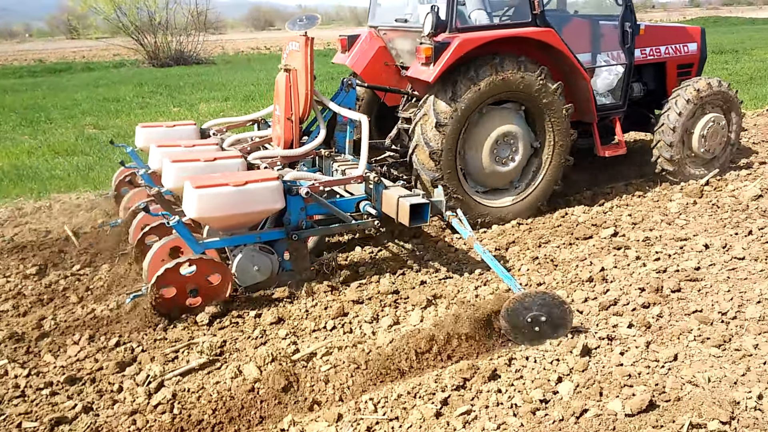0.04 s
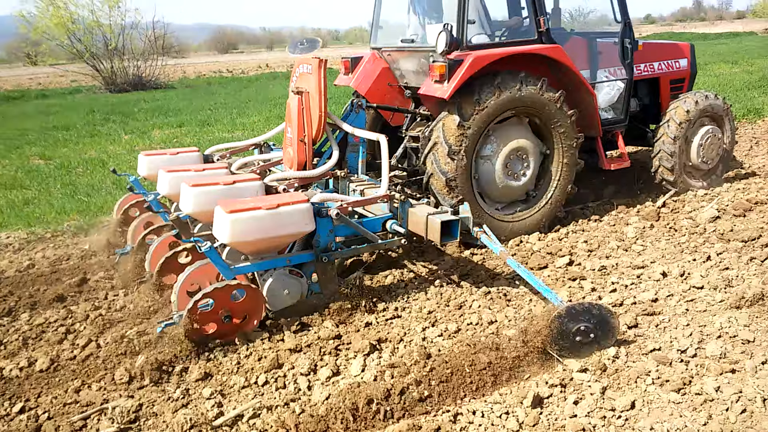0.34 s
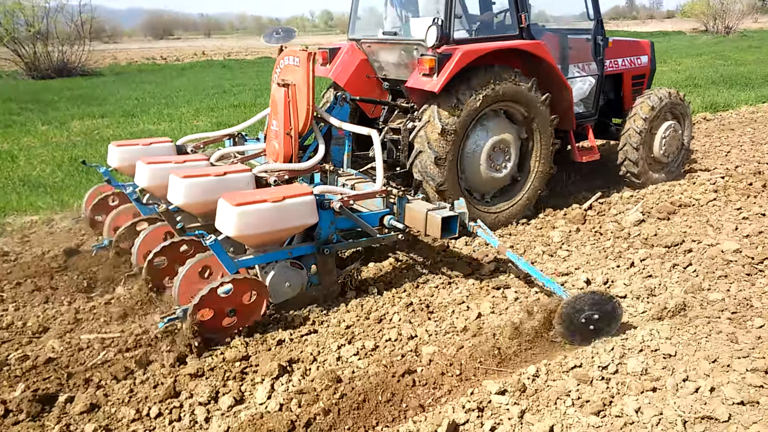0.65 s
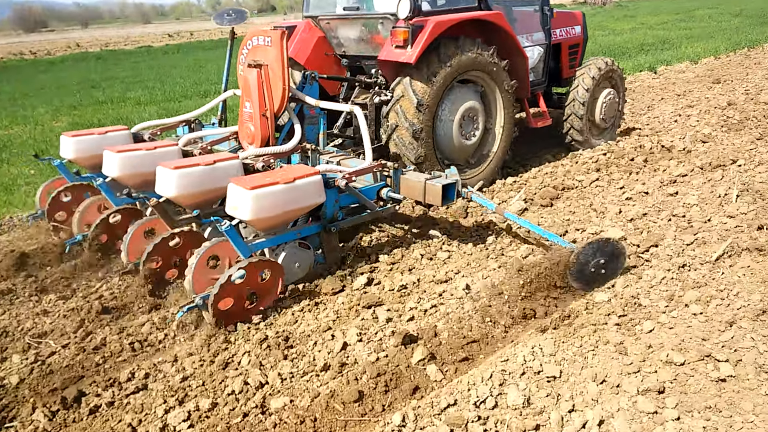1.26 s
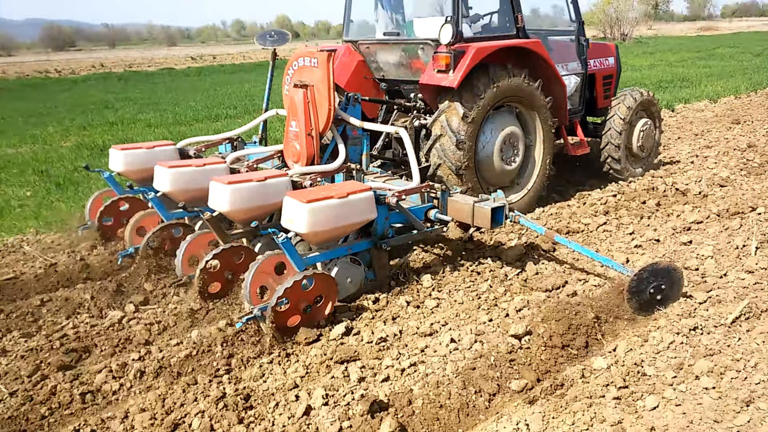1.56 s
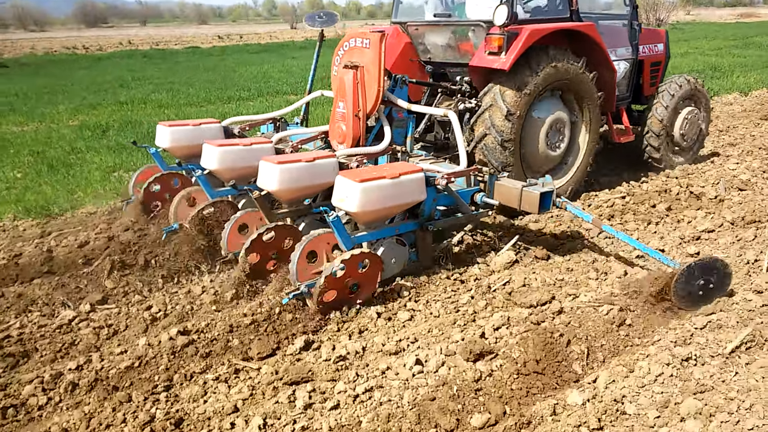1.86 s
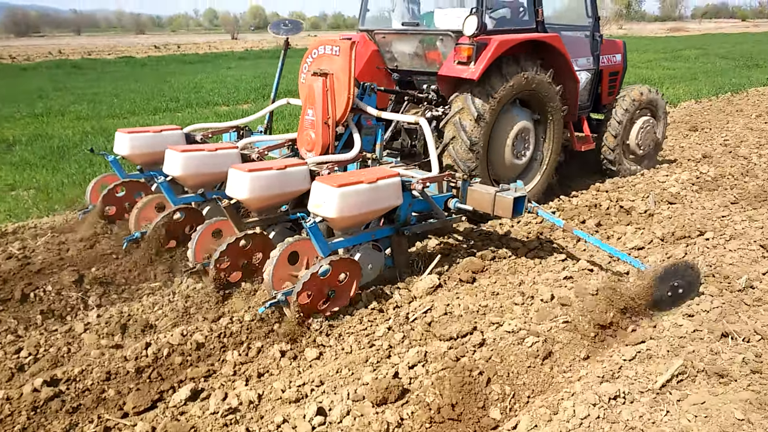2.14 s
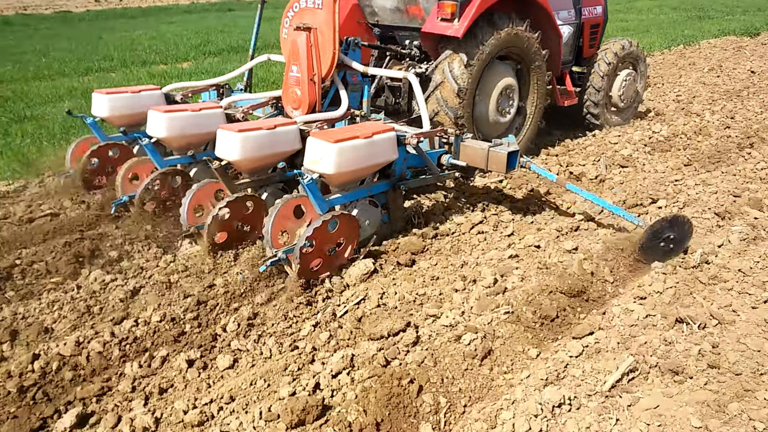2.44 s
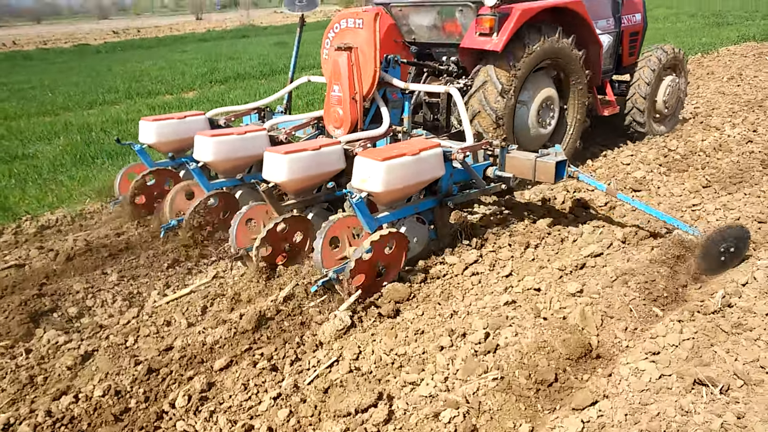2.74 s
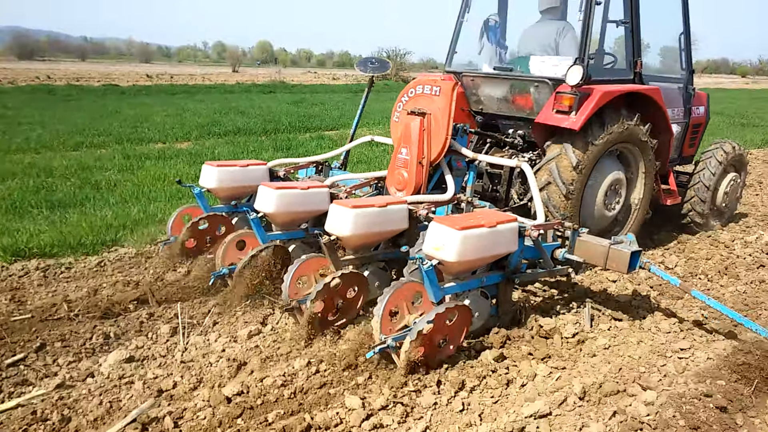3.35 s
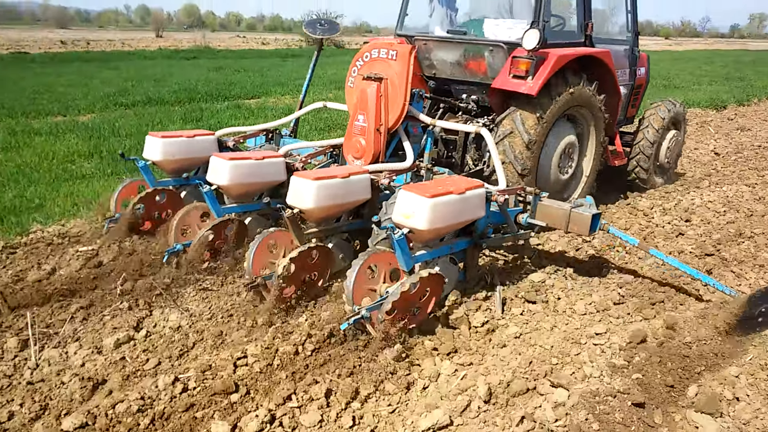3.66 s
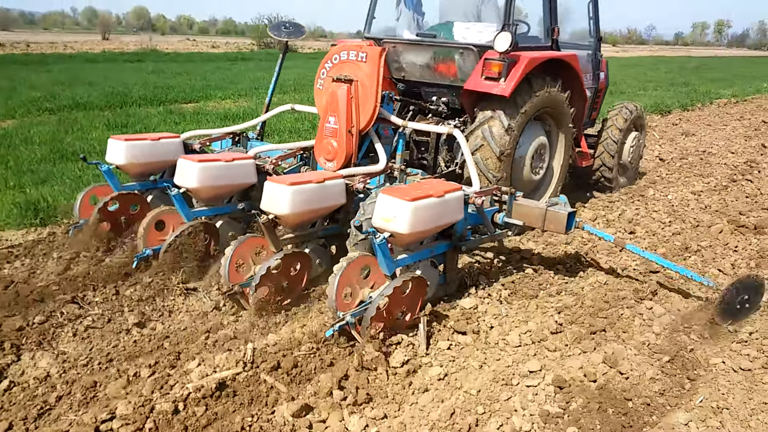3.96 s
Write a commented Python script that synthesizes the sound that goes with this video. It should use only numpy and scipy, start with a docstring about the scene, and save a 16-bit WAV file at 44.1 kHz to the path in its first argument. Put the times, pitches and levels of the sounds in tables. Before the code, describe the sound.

A diesel tractor engine clatters steadily, its tone shifting as it draws ahead. The seed planter behind it adds a wavering fan whine and faint clinks. Wind buffets and hisses on the microphone, gusting strongly from about 1 to 2 seconds. A shrill wind whistle sounds around 2.2 to 2.4 seconds, the heaviest wind thumps land near 3 seconds, and two quick dull clanks come at 3.8 seconds.

```python
"""Tractor and seed planter in wind.

A diesel tractor pulls a clinking planter with a whining fan across a field, heard from beside,
then from behind. Firings ring the block and panels over a low exhaust note. Gusts buffet the
microphone, hiss across its port and make it whistle; a limiter ducks the mix at the peaks."""
import sys
import numpy as np
from scipy import signal
from scipy.fft import rfft, irfft
from scipy.io import wavfile
from scipy.ndimage import uniform_filter1d, minimum_filter1d

SR = 44100
rng = np.random.default_rng(int(sys.argv[2]) if len(sys.argv) > 2 else 0)


def store_wav(level_fs):
    """Save 16-bit WAV to argv[1]."""
    pcm = np.round(np.clip(np.atleast_2d(level_fs), -1, 1) * 32767)
    wavfile.write(sys.argv[1], SR, pcm.T.astype(np.int16))


N = 176400
TIME = np.arange(N) / SR

# Spectrum of air hiss and grit. Each row: frequency in Hz, relative density in dB.
HISS_SPECTRUM = [(2000, -21), (4200, -29), (5500, -18.5), (6300, -14), (6600, -2), (6950, -13.5),
                 (7700, -3), (8500, 0), (9600, 0.5), (10800, -0.5), (12000, -3), (13200, -12.5),
                 (16000, -11.5)]


def from_db(db):
    """Decibels to gain."""
    return 10 ** (np.asarray(db) / 20)


def rms_one(x):
    """Scale to rms 1."""
    return x / np.sqrt(np.mean(x ** 2) + 1e-20)


def in_time(rows):
    """Columns after the time column, interpolated to every sample."""
    times_s, *columns = np.transpose(rows)
    return [np.interp(TIME, times_s, column) for column in columns]


def white():
    """Fresh white noise."""
    return rng.standard_normal(N)


def ticks(per_s):
    """Random impulses of uneven size."""
    return (rng.random(N) < per_s / SR) * np.minimum(rng.exponential(1, N), 3)


def drift(rate_hz):
    """Smooth random wander, rms 1."""
    pole = np.exp(-20 * np.pi * rate_hz / SR)  # runs at SR / 10
    slow = signal.lfilter([1], [1, -2 * pole, pole * pole], rng.standard_normal(N // 10 + 4002))[4000:]
    return np.interp(np.arange(N) / 10, np.arange(len(slow)), rms_one(slow))


def colour(x, spectrum):
    """Shape by a smooth spectrum, rolled off below 20 Hz; rms 1."""
    hz, db = np.transpose(spectrum)
    bins_hz = np.maximum(np.fft.rfftfreq(N, 1 / SR), 1)
    gain = from_db(np.interp(np.log(bins_hz), np.log(hz), db)) * np.minimum(bins_hz / 20, 1)
    return rms_one(irfft(rfft(x) * gain, N))


def resonate(x, hz, width_hz):
    """Steep-skirted resonance, rms 1."""
    band = signal.butter(2, [hz - width_hz / 2, hz + width_hz / 2], "band", fs=SR, output="sos")
    return rms_one(signal.sosfilt(band, x))


def breathy(hz, half_width_hz):
    """Noise band with a moving centre, rms 1."""
    lowpass = signal.butter(2, half_width_hz, fs=SR, output="sos")
    baseband = signal.sosfilt(lowpass, white() + 1j * white())
    return rms_one(np.real(baseband * np.exp(2j * np.pi * np.cumsum(hz) / SR)))


def air_hiss():
    """Fluttering air hiss with grains of crumbling soil, plus two microphone port resonances."""
    # Hiss and lower resonance. Each row: time in seconds, level in dB.
    hiss_levels = [(0, -25), (.12, -17.5), (.2, -21.5), (.46, -18), (.72, -21), (.95, -20), (1.05, -28),
                   (1.11, -20), (1.15, -24), (1.28, -15), (1.38, -25), (1.52, -18), (1.9, -12.5),
                   (2.1, -19), (2.22, -18.5), (2.35, -13.5), (2.47, -12.5), (2.52, -31), (2.8, -53),
                   (3.03, -21), (3.16, -27), (3.26, -20), (3.35, -18), (3.5, -13.5), (3.7, -13), (4, -13)]
    port_levels = [(0, -34), (1.2, -34.5), (1.4, -38), (1.85, -29), (2.12, -31), (2.2, -25.5),
                   (2.45, -23.5), (2.5, -24.5), (2.62, -21.5), (2.8, -22.5), (2.855, -20.5), (2.89, -30.5),
                   (3.05, -24.5), (3.14, -24.5), (3.25, -21.5), (3.3, -28), (3.4, -41), (4, -40)]
    # Lower resonance. Each row: time in seconds, centre in Hz.
    port_centres = [(0, 5280), (2.2, 5300), (2.6, 5430), (2.85, 5230), (3.05, 5060), (3.2, 4880),
                    (3.27, 4570), (4, 4967)]
    # Upper resonance. Each row: time in seconds, centre in Hz, level in dB.
    swish_curve = [(0, 8440, -40), (.7, 8490, -24.5), (1.15, 8300, -22.5), (1.8, 8300, -16.5),
                   (2.1, 8500, -24), (2.35, 9700, -25), (2.5, 11300, -28), (2.68, 11300, -34.5),
                   (2.85, 10500, -29.5), (3.05, 9400, -19.5), (3.13, 9340, -36), (3.25, 10220, -11),
                   (3.36, 9270, -19), (3.55, 8720, -15.5), (4, 8450, -15.5)]
    hiss_db, = in_time(hiss_levels)
    port_db, = in_time(port_levels)
    port_hz, = in_time(port_centres)
    swish_hz, swish_db = in_time(swish_curve)
    grain_decay_s, flutter_db = .003, 0.57
    grains = signal.lfilter([1], [1, -np.exp(-1 / (grain_decay_s * SR))], ticks(per_s=110))
    hiss = from_db(hiss_db - 2.5) * colour(white() * (1 + .27 * grains), HISS_SPECTRUM)
    port = from_db(port_db) * breathy(port_hz, half_width_hz=353)
    swish = from_db(swish_db) * breathy(swish_hz, half_width_hz=580)
    return (hiss + port + swish) * from_db(flutter_db * drift(32))


def port_whistle():
    """Edge tone at the port with two overtones: once faint, once loud."""
    # Each row: time in seconds, pitch in Hz, level in dB, relative octave level in dB.
    curve = [(.15, 5300, -58, -8), (.2, 5370, -35, -6), (.24, 5380, -27, 2), (.28, 5300, -70, -10),
             (2.15, 5380, -80, -30), (2.2, 5300, -29, -30), (2.228, 5130, -10, -28),
             (2.244, 5140, -17, -25), (2.26, 5100, -12, -24), (2.295, 5130, -0.5, -11),
             (2.33, 5176, -6, -10), (2.356, 5390, -13, 3), (2.40, 5283, -4, -15), (2.414, 5330, -5.5, -20),
             (2.435, 5490, -23, -20)]
    jitter_hz, flutter_db, third_harmonic_db = 17, 1.7, -26
    hz, db, octave_db = in_time(curve)
    phase = 2 * np.pi * np.cumsum(hz + jitter_hz * drift(136)) / SR
    tone = np.sin(phase) + from_db(octave_db) * np.sin(2 * phase)
    tone += from_db(third_harmonic_db) * np.sin(3 * phase)
    sounding = (TIME > curve[0][0]) * (TIME < curve[-1][0])
    return np.sqrt(2) * from_db(db + flutter_db * drift(80)) * tone * sounding


def buffeting():
    """Lumpy turbulence and single eddy thuds on the microphone, over a deep rumble."""
    # Each row: time in seconds, level in dB.
    gusts = [(0, -8.5), (.05, -16.5), (.13, -12), (.2, -8), (.35, -10.5), (.39, -16), (.5, -23),
             (.55, -5.5), (.59, -21), (.66, -15), (.7, -20), (.78, -22), (.81, -3.5), (.92, -15.5),
             (.96, -1.5), (1.05, -7), (1.08, -18.5), (1.16, -0.5), (1.2, -16), (1.23, -1.5), (1.26, -16),
             (1.36, 5), (1.47, -7.5), (1.59, -2.5), (1.65, -9.5), (1.78, -1), (1.93, 0), (2.05, -0.5),
             (2.14, -9.5), (2.24, -24), (2.45, -16.5), (2.49, -1.5), (2.54, -21.5), (2.7, -15), (2.82, -29),
             (2.86, -5), (2.93, 7), (3.03, -2.5), (3.19, 0.5), (3.23, -20), (3.28, -0.5), (3.34, -4.5),
             (3.37, -9.5), (3.5, -13), (3.72, -33), (4, -21)]
    eddies = [(2.939, 2.5), (3.006, -3), (3.083, 12.5), (3.119, 12.5), (3.190, -4), (3.312, -12)]
    # Each row: frequency in Hz, relative density in dB.
    buffet_spectrum = [(20, -22), (50, -15), (110, 2), (240, 0), (400, -6.5), (650, -13.5), (1000, -25),
                       (2000, -44.5), (4000, -71), (16000, -78)]
    rumble_spectrum = [(20, -11), (50, -0.5), (110, 2), (200, -17), (500, -40), (2000, -76)]
    lump_depth_db, thud_rise_s, thud_decay_s = 3, 0.0025, 0.011
    gust_db, = in_time(gusts)
    thud_envelope = np.zeros(N)
    for start_s, db in eddies:
        age_s = np.maximum(TIME - start_s, 0)
        thud_envelope += from_db(db) * np.exp(-age_s / thud_decay_s) * (1 - np.exp(-age_s / thud_rise_s))
    lumps = colour(white() * from_db(lump_depth_db * drift(52)), buffet_spectrum)
    rumble = from_db(-10 + .85 * gust_db) * colour(white(), rumble_spectrum)
    return from_db(gust_db) * lumps + thud_envelope * colour(white(), buffet_spectrum) + rumble


def grit():
    """Sparse 1 ms ticks of dry soil on the steel discs."""
    envelope = signal.lfilter([1], [1, -np.exp(-1000 / SR)], ticks(per_s=25) + 1e-18)
    return from_db(-33) * colour(envelope * white(), HISS_SPECTRUM)


def clinks():
    """Loose links and seed discs ring briefly at random."""
    # Each row: frequency in Hz, level in dB.
    modes = [(1150, -36), (1330, -41), (1480, -41), (1760, -37.5), (1890, -35), (2030, -44), (2310, -45)]
    width_hz = 23
    radius = np.exp(-np.pi * width_hz / SR)
    out = np.zeros(N)
    for hz, db in modes:
        hits = ticks(per_s=12) + 1e-9 * white()
        feedback = [1, -2 * radius * np.cos(2 * np.pi * hz / SR), radius * radius]
        out += from_db(db) * rms_one(signal.lfilter([1, 0, -1], feedback, hits))
    return out


def frame_knocks():
    """Short, dull clanks of the planter frame over clods."""
    # Each row: start in seconds, level in dB.
    knocks = [(3.787, -14.5), (3.814, -13)]
    # Each row: frequency in Hz, relative density in dB.
    spectrum = [(200, -8), (400, 0), (1500, 0), (2200, -1), (2700, 2), (3100, -5), (3500, -2), (4300, -12),
                (7000, -6), (12000, -23)]
    decay_s = 0.013
    envelope = sum(from_db(db) * (TIME >= start_s) * np.exp(-np.abs(TIME - start_s) / decay_s)
                   for start_s, db in knocks)
    return envelope * colour(white(), spectrum)


def fan(firings):
    """Planter fan geared to the engine: a wavering whine and a lower drone."""
    # Each row: time in seconds, whine level in dB, drone level in dB.
    levels = [(0, -37, -20), (.55, -19, -76.5), (1.0, -41, -26.5), (1.8, -24, -21), (2.3, -22, -34),
              (2.7, -17.5, -29.5), (3.2, -29, -12.5), (3.75, -21.5, -27), (4, -33.5, -16)]
    cycles_per_firing, waver_depth, waver_rad = (16.98, 11.35), 0.32, 0.32
    out = np.zeros(N)
    for ratio, db in zip(cycles_per_firing, in_time(levels)):
        amplitude = np.sqrt(2) * from_db(db) * (1 + waver_depth * drift(6.4))
        out += amplitude * np.sin(2 * np.pi * ratio * firings + waver_rad * drift(19))
    return out


def exhaust(firings):
    """Low harmonics of the firing rate, each unsteady in level."""
    # Each row: multiple of the firing rate, relative level in dB.
    harmonics = [(1, -31), (2, -18), (3, -39), (4, -28), (5, -41.5), (6, -42.5)]
    # Each row: time in seconds, gain in dB.
    boom = [(0, -11), (.6, -3.5), (1.0, 4.5), (1.8, 8), (2.3, -2), (2.8, -4), (3.1, 4), (3.6, 2), (4, -6)]
    boom_db, = in_time(boom)
    note = np.zeros(N)
    for multiple, db in harmonics:
        amplitude = from_db(db) * (1 + 0.4 * drift(10.6))
        note += amplitude * np.sin(2 * np.pi * (multiple * firings + rng.random()))
    return np.sqrt(2) * from_db(boom_db) * note


def knock_envelope(age_s, rise_s=0.0027, decay_s=0.0092):
    """Rise and decay of one combustion knock."""
    return np.exp(-age_s / decay_s) * (1 - np.exp(-age_s / rise_s))


def engine_knocks(firings, firing_hz):
    """Noise burst at each firing, a weaker one halfway; part of the noise repeats every cycle."""
    # Knock gain in dB, one per cylinder.
    cylinder_db = [5.5, 6.5, 7]
    wander_db, halfway_db, floor, repeat_share = 3.6, -3, 0.62, .45
    cylinders = len(cylinder_db)
    strength = from_db(np.array(cylinder_db)[firings.astype(int) % cylinders] + wander_db * drift(19))
    bursts = knock_envelope(firings % 1 / firing_hz)
    bursts += from_db(halfway_db) * knock_envelope((firings + .5) % 1 / firing_hz)
    cycle_samples = int(cylinders * SR / firing_hz.mean())
    repeating = white()[(firings / cylinders % 1 * cycle_samples).astype(int)]
    rattle = np.sqrt(repeat_share) * repeating + np.sqrt(1 - repeat_share) * white()
    return (floor + strength * bursts) * rattle


def engine_body(firings, firing_hz):
    """Knocks ring the block and panels; other panels face the listener as the tractor draws ahead."""
    # Each row: frequency in Hz, relative density in dB.
    clatter_spectrum = [(40, -12), (110, 2.5), (300, -8), (560, -3.5), (800, -13), (1300, -6.5),
                        (2000, -18), (2600, -17), (3200, -23), (4000, -29), (8000, -13), (16000, -30)]
    # Panel modes per side. Each row: centre in Hz, width in Hz, level in dB.
    beside = [(285, 75, -24.5), (696, 79, -26.5), (1132, 91, -27.5), (1320, 126, -28), (1912, 190, -28.5),
              (2480, 135, -36)]
    aslant = [(409, 38, -33.5), (639, 89, -20), (984, 180, -26.5), (1730, 130, -21.5), (1866, 72, -31),
              (2240, 230, -26.5)]
    behind = [(418.6, 62, -19), (924, 116, -21), (1480, 130, -23), (1651, 80, -26), (2020, 220, -31.5),
              (2660, 60, -60)]
    # Each row: time in seconds, overall gain in dB.
    levels = [(0, -1.5), (.45, -0.5), (.8, 0.5), (1.35, -0.5), (1.8, -4.5), (2.3, -1.5), (2.8, 0.5),
              (2.95, -2.5), (3.3, 0.5), (3.75, 1), (4, -1)]
    past = np.clip(.5 + (TIME - 1.49) / 0.94, 0, 1)  # beside to aslant
    away = np.clip(.5 + (TIME - 3.06) / 0.47, 0, 1)  # aslant to behind
    knocks = engine_knocks(firings, firing_hz)
    out = from_db(-20) * colour(engine_knocks(firings, firing_hz), clatter_spectrum)
    for facing, panels in ((1 - past, beside), (past * (1 - away), aslant), (away, behind)):
        for hz, width_hz, db in panels:
            out += np.sqrt(facing) * from_db(db + 1.5 * drift(2.9)) * resonate(knocks, hz, width_hz)
    return out * from_db(in_time(levels)[0])


def scene():
    """Tractor and planter in the open, wind at the microphone; mono."""
    # Each row: time in seconds, firing rate in Hz.
    engine_speed = [(0, 39.6), (.3, 39.2), (.6, 37.3), (1.0, 36.5), (1.5, 36.6), (2.0, 37.1), (2.4, 37.6),
                    (2.8, 38.2), (3.3, 38.2), (4, 38.3)]
    firing_hz, = in_time(engine_speed)
    firings = np.cumsum(firing_hz) / SR
    tractor = engine_body(firings, firing_hz) + exhaust(firings)
    planter = fan(firings) + frame_knocks() + clinks()
    wind = buffeting() + air_hiss() + port_whistle()
    return (tractor + planter + wind + grit())[None]


def record(dry):
    """Peak limiter with fast attack and slower release, then a steep low-pass."""
    ceiling, release_db_per_s, window_s, cutoff_hz = 0.91, 81.5, 0.0032, 15850
    window = int(window_s * SR)
    over_db = 20 * np.log10(np.maximum(np.abs(dry[0]) / ceiling, 1))
    release_db = release_db_per_s * TIME
    held_db = np.maximum.accumulate(over_db + release_db) - release_db
    gain_db = uniform_filter1d(minimum_filter1d(-held_db, window), window)
    lowpass = signal.ellip(12, .1, 80, cutoff_hz, fs=SR, output="sos")
    return signal.sosfilt(lowpass, dry * from_db(gain_db))


dry = scene()
out = record(dry)
store_wav(out)
```